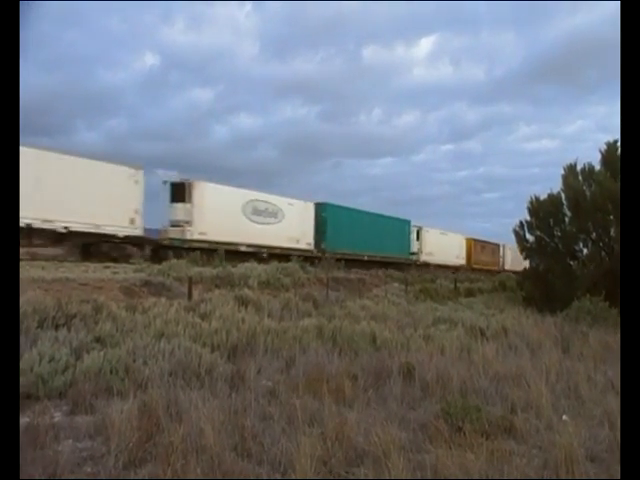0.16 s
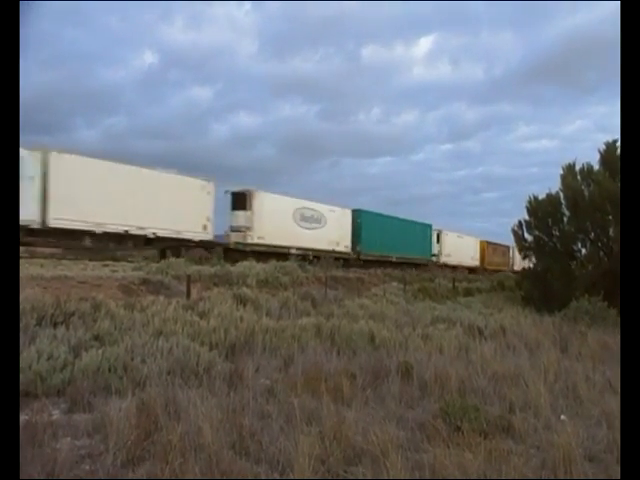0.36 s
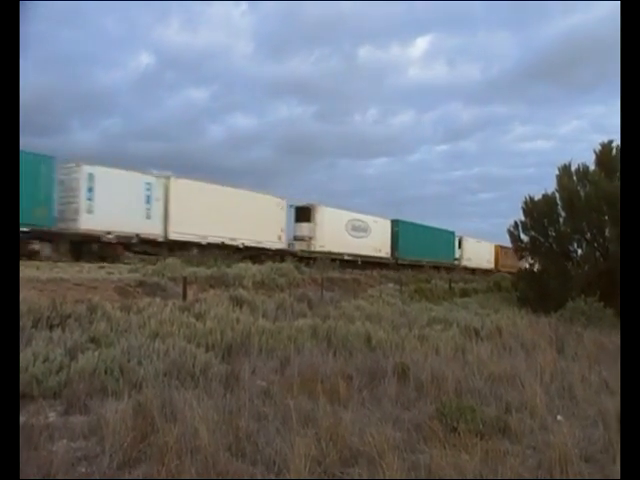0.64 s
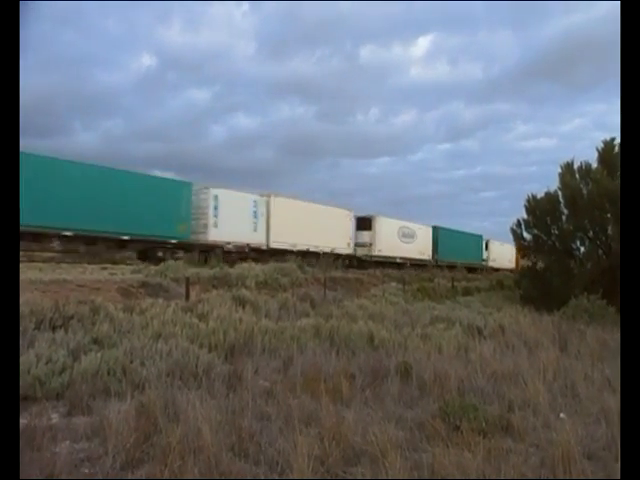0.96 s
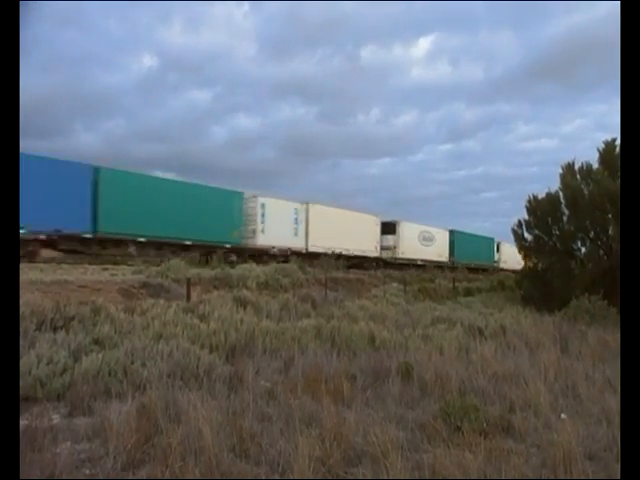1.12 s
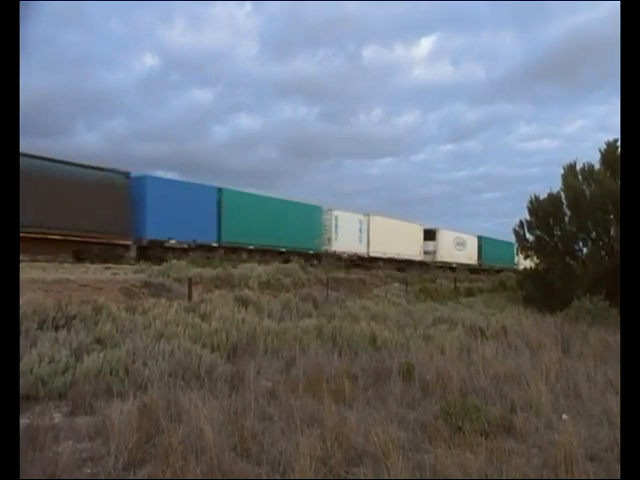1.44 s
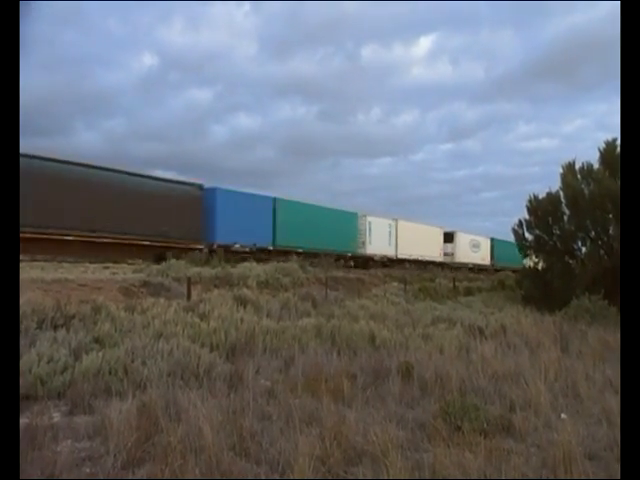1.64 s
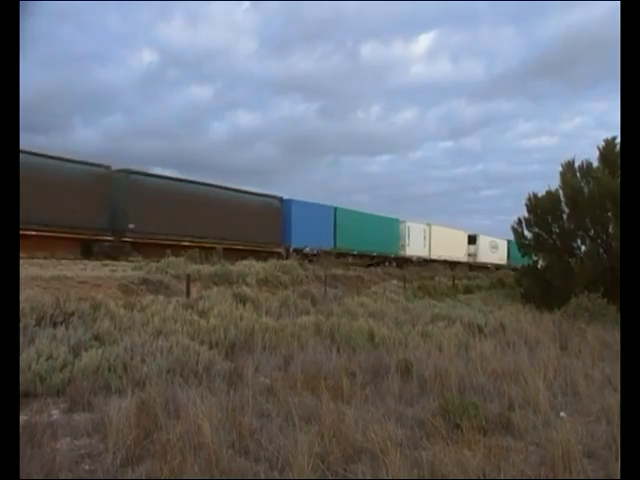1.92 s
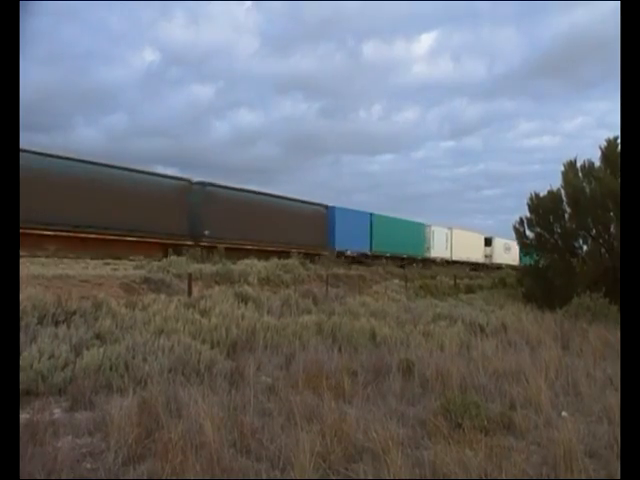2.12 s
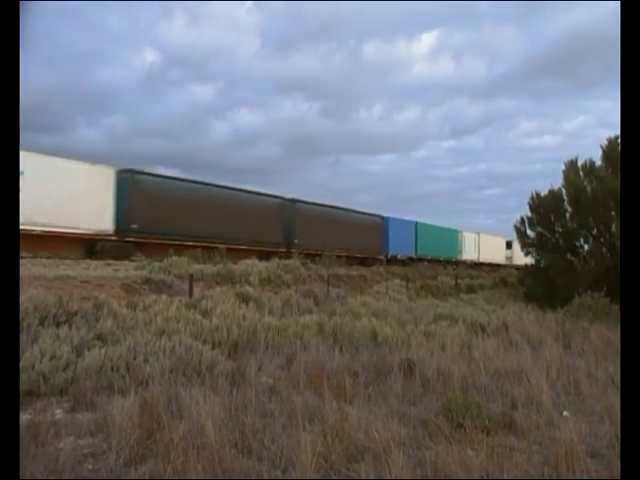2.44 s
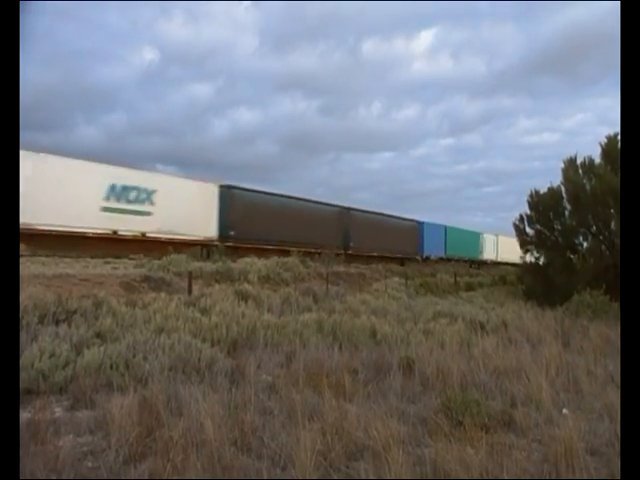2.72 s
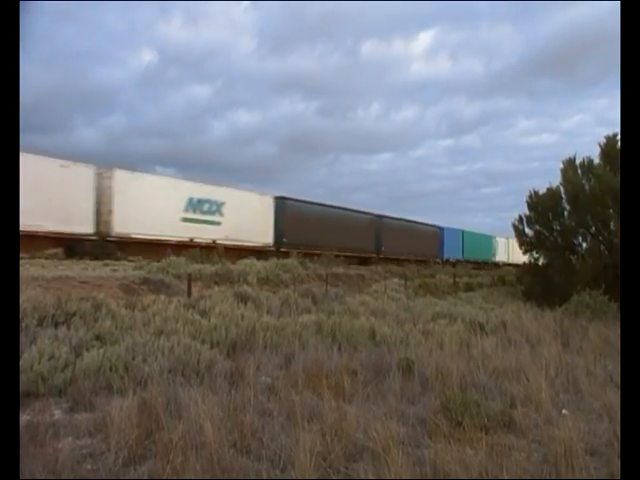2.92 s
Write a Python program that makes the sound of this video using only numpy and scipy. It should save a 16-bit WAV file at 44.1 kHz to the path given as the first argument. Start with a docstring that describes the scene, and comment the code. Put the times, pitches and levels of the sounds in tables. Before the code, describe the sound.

Heavy freight wagons pass continuously outdoors, heard close in stereo: bassy, uneven rumble and thumps, rough rolling noise swelling with each set of wheels, irregular knocks and faint metallic rings, with low peaks distorting the microphone input.

```python
"""A deep, thumping rumble comes first, under the hum, roar and hiss of a long freight train rolling past
over open scrub. Rumble and rolling sound are shaped noise; thumps are short low swings. Fuzzy rail
hums, mostly sliding down, are narrow noise. Wheel knocks are short bursts of noise, and brief steel
rings are wavering tones. Two close microphones hear it all, and the biggest peaks overload the input."""
import sys
import numpy as np
from scipy import signal
from scipy.io import wavfile
from scipy.ndimage import uniform_filter1d

SR = 44100
rng = np.random.default_rng(int(sys.argv[2]) if len(sys.argv) > 2 else 0)


def ratio_of_db(decibels):
    """Turn decibels (scalar or array-like) into linear amplitude factors; 0 dB maps to 1."""
    return 10 ** (np.asarray(decibels, float) / 20)


def pcm_store(signal):
    """Save signal as 16-bit PCM."""
    levels = np.round(np.clip(np.atleast_2d(signal), -1, 1) * 32767)
    wavfile.write(sys.argv[1], SR, levels.astype(np.int16).T)


N = 135387  # length in samples
LEAD_S = 7e-5  # left hears the train this much before right


def evened(x):
    """Scales a signal to rms 1."""
    return x / np.sqrt(np.mean(x ** 2) + 1e-20)


def read(points, hz):
    """Reads a table between its points, with frequency on a log scale."""
    f, value = np.transpose(points)
    return np.interp(np.log(hz + 1), np.log(f + 1), value)


def level(table, index):
    """Turns one dB column of a table into a gain over time."""
    rows = np.array(table)
    return ratio_of_db(np.interp(np.arange(N) / SR, rows[:, 0], rows[:, index]))


def placed(x):
    """A single source reaches the left microphone a moment before the right."""
    return np.array([x, np.roll(x, round(LEAD_S * SR))])


def hum(hz, width_hz):
    """Slow random wobble, shifted up to hz (fixed or moving), makes a fuzzy tone of rms 1."""
    r = np.exp(-np.pi * width_hz / SR)
    slow = [1, 1j] @ rng.standard_normal((2, N))
    for _ in range(2):
        slow = signal.lfilter([1], [1, -r], slow)
    slow = slow / (abs(slow) + 1e-9) ** 0.5  # evens out half of the level flutter, in dB
    carrier = np.exp(2j * np.pi * np.cumsum(hz * np.ones(N)) / SR)
    return evened((slow * carrier).real)


# How alike left and right are: f/Hz, likeness (1 = the same)
LIKENESS = [(60, 1), (400, .97), (1000, 0.87), (2000, 0.75), (4000, 0.29), (6200, 0.43), (6400, 1),
            (11000, 0.67)]
# How much louder left is than right: f/Hz, level/dB
LEFT_LEAN = [(60, -0.5), (140, -0.5), (340, 0), (810, -0.5), (1940, 1), (4640, 0.0), (11100, -8)]


def noise(spectrum, lo_hz, hi_hz, patchy_db, flicker_db, size, span):
    """One band of noise at two microphones, with drifting patches and a shared flicker; mid rms 1."""
    hop = size // 4
    frames = N // hop + 5
    hz = np.fft.rfftfreq(size, 1 / SR)[:, None]
    a, b, c, d, patches = rng.standard_normal((frames, len(hz), 5)).T
    for axis in (0, 1):  # smooth over frequency, then time
        patches = uniform_filter1d(patches, size=span, axis=axis)
    patches = evened(patches)
    flicker = evened(uniform_filter1d(rng.standard_normal(frames), size=3))

    same = np.clip(read(LIKENESS, hz), -1, 1)
    left = a + 1j * b
    right = same * left + np.sqrt(1 - same ** 2) * (c + 1j * d)
    lag = np.exp(-2j * np.pi * hz * LEAD_S * (hz < 6215))  # no delay from 6215 Hz up
    lean = ratio_of_db(read(LEFT_LEAN, hz) / 2)
    z = np.array([left * lean, lag / lean * right])

    edges = ((1 + (lo_hz / (hz + 1)) ** 16) * (1 + (hz / hi_hz) ** 16)) ** -0.5
    z *= edges * ratio_of_db(read(spectrum, hz) + patchy_db * patches + flicker_db * flicker)
    x = signal.istft(z, nperseg=size, noverlap=size - hop)[1][:, :N]
    return x / np.std(x.mean(0))


# Rumble of wagons and ground, before trim and levelling: t/s, deep level/dB, upper level/dB
RUMBLE_LEVELS = [(0.12, -22, -13), (0.17, -12, -15.5), (0.87, -16, -15), (0.89, -14, -12.5),
                 (1.71, -13.5, -13.5), (1.73, -18, -15.5), (2.02, -11.5, -14), (2.4, -11, -16.5),
                 (2.83, -9.5, -17), (2.88, -9.5, -15.5)]
# Relative strength of the rumble along the pitch scale: f/Hz, level/dB (per Hz)
RUMBLE_SPECTRUM = [(12, -34), (20, 3), (43, 1.5), (80, -5), (120, -10), (245, -22.5), (400, -7.5),
                   (520, -59), (880, -120)]


def rumble():
    """Wagons and ground rumble in two bands, each kept even by partly levelling its own loudness."""
    split_hz = 66.8
    deep = noise(RUMBLE_SPECTRUM, 21.2, split_hz, patchy_db=-0.5, flicker_db=-0.1, size=4096, span=3)
    upper = noise(RUMBLE_SPECTRUM, split_hz, 230.7, patchy_db=1.4, flicker_db=0.0, size=4096, span=3)
    share, half_window_s = 0.45, 0.11  # share levelled, half-length of the averaging window
    window = np.hanning(round(2 * half_window_s * SR))
    window = window / window.sum()

    def levelled(x):
        """Turns loud stretches down and quiet ones up."""
        power = signal.oaconvolve(x.mean(0) ** 2, window, "same")
        return x / (power + 0.024) ** (share / 2)

    deep = level(RUMBLE_LEVELS, index=1) * levelled(deep)
    upper = ratio_of_db(-0.16) * level(RUMBLE_LEVELS, index=2) * levelled(upper)
    return deep + upper


# Heavy thumps in the rumble as axles load the track: centre t/s, f/Hz, peak level/dB
LOW_THUMPS = [(.03, 44, -6.5), (0.214, 48, -2), (.345, 69.5, -3), (.415, 47.3, -2), (.545, 45.7, -4),
              (0.609, 65, -5.5), (.685, 44.5, -7.5), (.77, 49, -4.5), (1.07, 75.7, -0.5), (1.265, 45, -4.5),
              (1.331, 65, -3.5), (1.53, 44.5, -7), (1.693, 49.6, -1), (1.801, 89, -4), (1.95, 85, -1),
              (2.065, 50, -7), (2.222, 38.4, 3.5), (2.335, 44.7, -4.5), (2.481, 40.2, -2.5),
              (2.56, 41.6, -11), (2.606, 45, -1), (2.7, 39.5, -1.5), (2.9, 68, -0.5), (3.04, 35, -3.5)]


def thumps():
    """Each thump is a soft swing of one or two low cycles, pushing or pulling by chance."""
    t, total = np.arange(N) / SR, np.zeros(N)
    for centre, hz, db in LOW_THUMPS:
        swell = np.exp(-(2 * (t - centre) * hz / 1.3) ** 2)  # 1.3 cycles wide
        push_or_pull = np.sign(rng.random() - 0.5)
        total += push_or_pull * ratio_of_db(db) * swell * np.cos(2 * np.pi * hz * (t - centre))
    return total


# Rolling noise as bogies pass, before trim:
# t/s, rail hum level/dB, wheel roar level/dB, upper roar level/dB, hiss level/dB
ROLLING_LEVELS = [(0.0, -30, -29.5, -35, -41), (0.02, -22, -26.5, -32.5, -41),
                  (0.05, -27, -29.5, -33.5, -41.5), (0.18, -22.5, -26.5, -27.5, -39),
                  (0.2, -24.5, -25, -31, -37), (0.25, -27, -30, -33.5, -44), (0.32, -24, -24, -30.5, -39),
                  (.37, -25.5, -28, -33.5, -40.5), (0.45, -31, -33.5, -37.5, -45),
                  (0.48, -28, -27.5, -33, -42.5), (0.57, -27.5, -30.5, -34.5, -42.5),
                  (0.66, -24.5, -26, -30, -37.5), (0.81, -28.5, -29, -33, -40.5),
                  (0.82, -24, -26, -31, -38.5), (1.29, -26.5, -29.5, -32, -39),
                  (1.33, -30, -33, -35.5, -44.5), (1.45, -25, -24, -29, -36), (1.52, -22, -26, -29, -37),
                  (1.55, -27, -21, -22.5, -36), (1.57, -26.5, -25, -31, -39.5),
                  (1.72, -25.5, -27.5, -33, -42), (1.79, -22.5, -26, -29, -36.5),
                  (1.83, -26, -27.5, -31, -40.5), (2.3, -27.5, -30, -34, -40),
                  (2.35, -30, -32.5, -37.5, -44), (3.06, -29.5, -32.5, -35.5, -41),
                  (3.07, -16, -21, -30, -34)]
# The four bands in the same order: lowest f/Hz, highest f/Hz
ROLLING_BANDS = [(200, 1200), (1200, 2500), (2500, 6300), (6300, 13000)]
# Relative strength of rolling noise along the pitch scale: f/Hz, level/dB (per Hz)
ROLLING_SPECTRUM = [(150, -65), (250, -0.5), (490, -3.5), (887, -2), (1010, -4.5), (1160, -5.5), (1320, -9),
                    (1980, -8.5), (2400, -11.5), (2640, -10.5), (3050, -12), (3630, -12), (5970, -21.5),
                    (6570, -21.5), (7970, -20), (11000, -32), (11500, -46.5), (15000, -69), (22000, -120)]


def rolling():
    """Rough wheels on rough rail make hum, roar and hiss: four bands of noise with their own levels."""
    total = np.zeros((2, N))
    for k, (lo_hz, hi_hz) in enumerate(ROLLING_BANDS):
        band = noise(ROLLING_SPECTRUM, lo_hz, hi_hz, patchy_db=1.0, flicker_db=0.87, size=1024, span=9)
        total += level(ROLLING_LEVELS, index=k + 1) * band
    return ratio_of_db(0.29) * total


# Wheel and rail modes, before the swell: f/Hz, width f/Hz (of each smoothing filter), level/dB
STEEL_MODES = [(717, 150, -41), (900, 110, -42), (1954, 90, -43), (2680, 180, -45), (3540, 90, -47)]


def shaken_steel():
    """Wheel and rail modes, shaken at random, swell together with the wheel roar."""
    roar = level(ROLLING_LEVELS, index=2)
    modes = sum(ratio_of_db(db) * hum(hz, width_hz) for hz, width_hz, db in STEEL_MODES)
    return roar / np.mean(roar) * modes


# Rail hum, mostly sliding down as a wagon draws away:
# start t/s, length t/s, from f/Hz, to f/Hz, width f/Hz (of each smoothing filter), level/dB at the top
HUM_SLIDES = [(0.018, 0.41, 930, 860, 170, -31.5), (0.83, 0.2, 880, 900, 320, -28),
              (1.12, .5, 918, 869.5, 90, -33), (1.741, 0.1335, 919, 753, 160, -29),
              (1.822, .54, 733.5, 691.7, 100, -31)]


def slides():
    """Each swell of rail hum is narrow noise whose pitch glides from one value to another."""
    t, total = np.arange(N) / SR, np.zeros(N)
    for start, length, from_hz, to_hz, width_hz, db in HUM_SLIDES:
        u = np.clip((t - start) / length, 0, 1)
        swell = abs(np.sin(np.pi * u ** 0.78)) ** 0.35 * (u < 1)  # a smaller 0.35 holds it longer
        total += ratio_of_db(db) * swell * hum(from_hz + (to_hz - from_hz) * u, width_hz)
    return total


# Wheel knocks: t/s of the strongest moment, level/dB before the fade that runs during the rise
WHEEL_KNOCKS = [(0.1694, -29), (0.3, -29), (0.664, -22.5), (0.8394, -31), (0.93, -21), (1.463, -31),
                (1.543, -18.5), (1.7894, -28), (1.942, -18.5), (2.059, -20.5), (2.1794, -27),
                (2.4694, -28.5), (2.6894, -32), (2.8794, -28), (3.0294, -27)]


def knocks():
    """Wheel knocks are short, wide bursts of noise, their starts softened by distance."""
    rise_s, t60_s = 0.005, 0.1  # t60_s: time to fade by 60 dB
    tilt_db = 3.5  # per octave, brighter than the rolling noise
    t, shape = np.arange(N) / SR, np.zeros(N)
    for peak, db in WHEEL_KNOCKS:
        u = np.maximum(t - peak + rise_s, 0)
        shape += ratio_of_db(db - 60 * u / t60_s) * np.minimum(u / rise_s, 1)
    bright = [(hz, db + tilt_db * np.log2(hz / 1000)) for hz, db in ROLLING_SPECTRUM]
    return shape * noise(bright, 1200, 6000, patchy_db=1.5, flicker_db=1.0, size=512, span=9)


# Steel ringing out: start t/s, length t/s, f/Hz, rms level/dB at the top of the swell
STEEL_RINGS = [(0.198, 0.021, 1096, -18.5), (0.278, 0.027, 1200, -29), (.3, 0.045, 1300, -29.5),
               (0.636, 0.048, 1900, -30), (0.812, 0.06, 2650, -30.5), (1.4, 0.036, 2400, -32),
               (1.462, 0.082, 3540, -28), (0.95, 0.039, 840, -25), (1.1, .045, 890, -31),
               (2.5, 0.077, 610, -30.5), (2.1, 0.16, 720, -37), (1.4, 0.063, 680, -30),
               (1.6, 0.065, 870, -29), (2.5, 0.05, 5800, -37), (2.305, 0.023, 1200, -36),
               (1.425, 0.046, 2720, -28.5)]


def rings():
    """Ringing steel is a slightly wavering tone that swells quickly and fades."""
    waver_hz = 3.6  # rms wander of the pitch
    t, total = np.arange(N) / SR, np.zeros(N)
    for start, length, hz, db in STEEL_RINGS:
        wander = evened(uniform_filter1d(rng.standard_normal(N), size=900))
        turns = hz * t + np.cumsum(waver_hz * wander) / SR + rng.random()
        swell = np.sin(np.pi * np.clip((t - start) / length, 0, 1) ** 0.5)
        total += ratio_of_db(db) * np.sqrt(2) * swell * np.sin(2 * np.pi * turns)
    return total


def scene():
    """Adds up all parts of the passing train at the two microphones."""
    single_sources = thumps() + shaken_steel() + slides() + rings()
    return rumble() + rolling() + knocks() + placed(single_sources)


def low_pass(x):
    """Removes everything above the highest recorded frequency."""
    return signal.sosfilt(signal.butter(12, 12600, fs=SR, output="sos"), x)


def record(dry):
    """Gain control eases down on big rumble peaks; the biggest still overload the input and clip."""
    knee_db, share = -5.5, 0.22  # share of the excess over the knee that is taken off
    release_db_per_s = 85  # how fast the held level falls
    power_db = 10 * np.log10(abs(uniform_filter1d((dry ** 2).mean(0), size=500)) + 1e-12)
    fall = np.arange(N) * release_db_per_s / SR
    held_db = np.maximum.accumulate(power_db + fall) - fall
    over_db = np.maximum(held_db - knee_db, 0)
    eased = dry / ratio_of_db(share * uniform_filter1d(over_db, size=400))
    return low_pass(np.clip(eased, -1, 1))


dry = scene()
out = record(dry)
pcm_store(out)
```